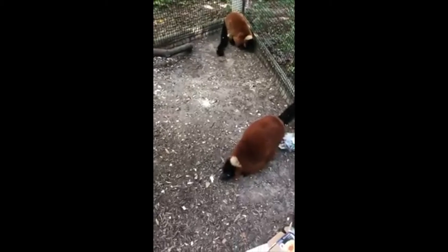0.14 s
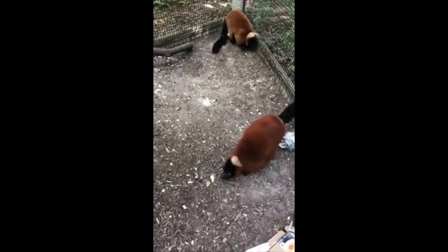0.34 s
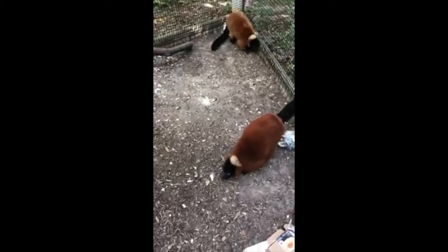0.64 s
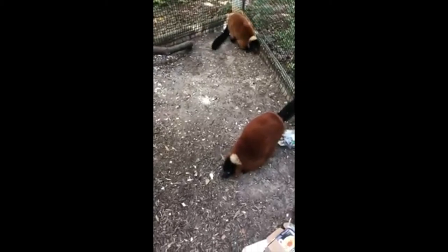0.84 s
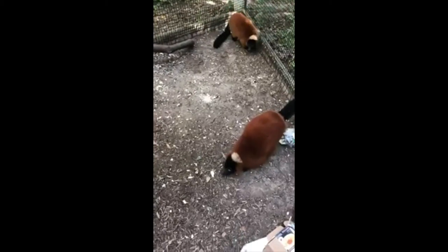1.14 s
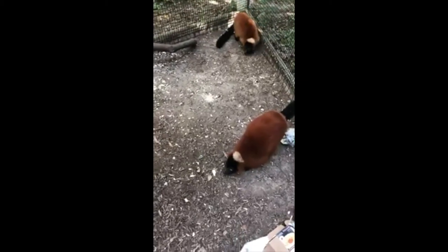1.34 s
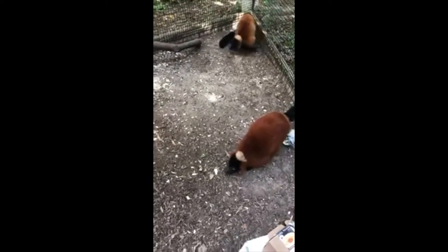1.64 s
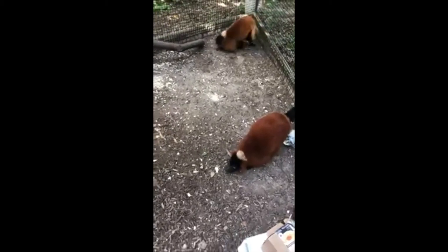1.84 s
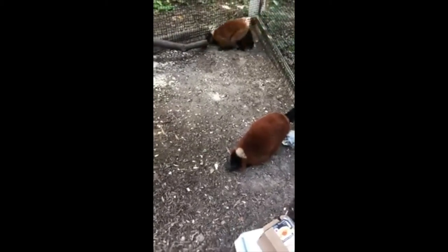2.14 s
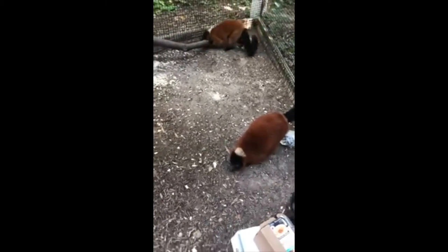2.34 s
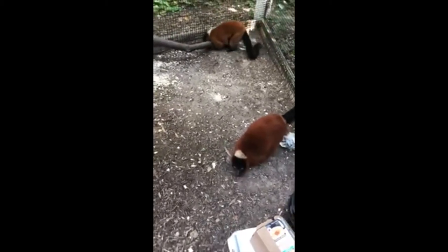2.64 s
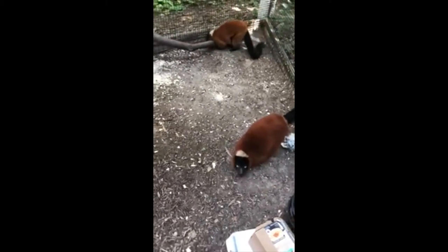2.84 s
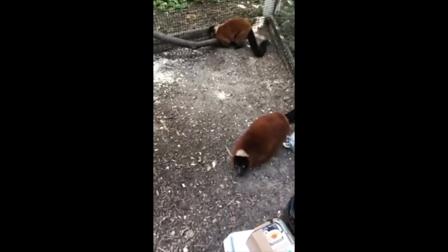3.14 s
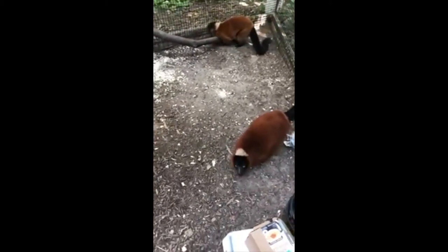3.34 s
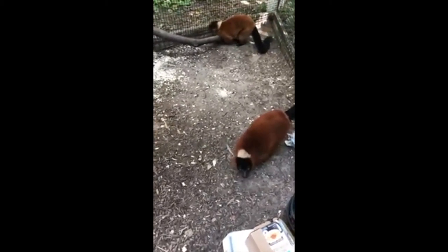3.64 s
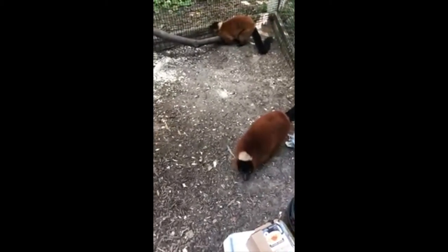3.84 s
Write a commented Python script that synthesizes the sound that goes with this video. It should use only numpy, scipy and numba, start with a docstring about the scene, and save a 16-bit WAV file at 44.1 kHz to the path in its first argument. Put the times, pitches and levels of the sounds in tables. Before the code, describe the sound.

Lemurs call loudly and close by in an outdoor pen. Three hoarse, partly rattling roars fill the first second, with more from 1.4 to 2.4 and 2.7 to 3.2 seconds. A second animal shrieks at the start, around 1.3 and at 2 seconds. Thin gliding whines fill the gaps. A bark and quick grunts come at 3.5 seconds, then a final roar and shriek at 3.8.

```python
"""Ruffed lemur chorus

Lemurs call in an outdoor pen, close to a phone. Hoarse roars, made of uneven glottal pulses
ringing the throat and mouth, break into a fast rattle, with a bark and a run of grunts near
the end. A second animal shrieks over them, and thin whines fill the gaps."""
import sys
import numpy as np
from scipy import signal
from scipy.fft import rfft, irfft
from scipy.io import wavfile
from scipy.ndimage import uniform_filter1d, map_coordinates
from numba import njit

SR = 44100
rng = np.random.default_rng(int(sys.argv[2]) if len(sys.argv) > 2 else 0)


def master_out(mix):
    """Clip the mix to full scale and print it as 16-bit PCM to the path in sys.argv[1]."""
    frames = np.transpose(np.atleast_2d(mix))
    ceiling = np.clip(frames, -1, 1)
    pcm = np.round(ceiling * 32767).astype(np.int16)
    wavfile.write(sys.argv[1], SR, pcm)


N = 176400
T = np.arange(N) / SR
ATTACK_S, RELEASE_S = 0.0067, 0.00062


def roars():
    """Glottal pulses ring chest, mouth and throat; resonances lift and rasp swells as the mouth opens."""
    # One list per roar. Each row: time in seconds, level in dB, mouth resonance in Hz,
    # upper resonance in dB against the mouth.
    roar_shapes = [
        [(0.018, -18.5, 780, -3), (0.308, -21, 933, -3), (0.437, -29, 775, -8.5)],
        [(0.457, -16, 750, -20), (0.533, -21, 914, -1), (0.725, -25.5, 1050, -6)],
        [(0.727, -19, 679.2, -4), (0.817, -17, 880, -2.5), (1.085, -24, 935, -1)],
        [(1.397, -21, 706, -5.5), (1.547, -19, 870, -0.5), (1.728, -31, 750, -3.5)],
        [(1.826, -21.5, 770, -6.5), (1.88, -17.5, 1100, -9.5), (1.94, -29, 990, 8.5)],
        [(2.133, -20.5, 688.2, -7.5), (2.235, -16.5, 834, -4.5), (2.425, -25.5, 824, -5.5)],
        [(2.729, -15, 680, -20), (2.869, -22.5, 768.2, 4.5), (2.949, -22, 686.2, -6)],
        [(2.968, -23, 674.4, -0.5), (3.196, -23, 770, 3), (3.226, -29, 736, -5.5)],
        [(3.82, -15.5, 674, -12), (3.854, -17, 780, -9), (4.0, -17.5, 850, -7.5)],
    ]
    # A bark, then a run of short grunts, with the same columns.
    grunt_shapes = [
        [(3.513,-20,840,-18),(3.55,-25.5,793,-3),(3.58,-33.5,654,4)],
        [(3.595,-31,676,-3),(3.632,-29,678.5,7),(3.665,-28,635,0.5),(3.705,-28,724,1),(3.73,-26.5,720.9,-1.5),(3.76,-31.5,670,1.5),(3.8,-26,710,-5.5)],
    ]
    # The throat in each of those calls. Each row: base upper resonance in Hz, rasp and chest in dB against
    # the voice, share by which the resonances start low, third resonance in Hz, its dB against the voice.
    throats = [(1246,-25,-11,0.056,1700,-14.5),(1390,-22.5,-13,0.3,2220,-14.5),(1200,-24.5,-12,0.017,1648,-11),(1173,-26,-12,0.12,1640,-18.5),(1464,-20,-14.5,0.51,2467,-16),(1247.6,-22.5,-12.5,0.12,1573,-16),(1423,-31.5,-15,0.61,2040,-18),(1341,-17.5,-9.5,0.099,1678,-4),(1381.5,-15,-9.5,0.13,2450,-16),(1530,-18,-11.5,0.047,2210,-7.5),(1667,-15,-8,0.024,2640,-17.5)]
    # The vocal folds. Each row: time in seconds, pitch in Hz, roughness.
    fold_track = [(.02,176,0.72),(.055,276.6,0.43),(.25,291.2,0.71),(.43,214,0.88),(.465,190.9,0.69),(.505,340,0.12),(.55,262.8,0.21),(.66,224.2,0.49),(.73,165,0.8),(.78,290.7,.5),(1.0,289.6,0.62),(1.085,194.5,.6),
                  (1.4,174.6,0.73),(1.5,298.7,0.71),(1.62,199,0.77),(1.825,175,0.72),(1.87,326.8,0.4),(1.94,219,.5),(2.135,174.3,0.26),(2.175,190.6,0.34),(2.205,312.4,0.52),(2.42,214.7,0.81),
                  (2.73,179.8,0.21),(2.78,326,0.27),(2.815,237.7,0.25),(2.84,206,0.07),(2.865,231.8,0.12),(2.93,247.1,0.35),(2.975,171.9,0.49),(3.05,269.1,0.44),(3.16,298.1,1.01),(3.225,180.5,0.62),(3.535,210.7,0.46),(3.63,273.3,0.79),(3.82,176,0.37),(3.86,205.5,0.18),(3.9,284,0.16),(4.0,289.6,0.6)]
    # Tone of the pulses feeding the mouth and upper resonances. Each row: frequency in Hz, gain in dB.
    mouth_eq = [(300,-41.5),(420,-7),(640,4),(1050,-4.5),(1600,-23.5)]
    upper_eq = [(750,-26),(1080,12.5),(1650,15.5),(2400,-11.5)]
    # High throat resonances. Each row: centre in Hz, gain in dB.
    rasp_bands = [(2480,-8),(3020,3.5),(3750,-2),(4750,-2.5),(5550,-3),(7250,-9.5),(8350,-12),(9700,-18.5),(11500,-16.5),(13500,-19)]

    pitch, rough = curves(fold_track)
    voice, breath = vocal_folds(pitch, np.clip(rough, 0, 1))
    calls = list(roar_shapes) + grunt_shapes
    rows = sorted((*row, *throat) for call, throat in zip(calls, throats) for row in call)
    db, mouth_hz, upper_db, upper_hz, rasp_db, chest_db, drop, third_hz, third_db = curves(rows)
    onsets, opening_s = [call[0][0] for call in calls], 0.062
    closed = np.max([np.exp(-np.abs(T - at) / opening_s) * (T > at - ATTACK_S) for at in onsets], axis=0)
    lift = 1 - np.clip(drop, 0, .6) * closed
    follow_mouth = (mouth_hz / np.mean(mouth_hz)) ** 0.31
    upper_hz = upper_hz * lift * np.exp(.04 * walk(50)) * follow_mouth

    puff = undb(-23) * steady(ring(breath, hz=80, width=250))
    chest = undb(0.37) * steady(ring(voice, hz=256, width=240)) + puff
    mouth = steady(resonate(colour(voice, mouth_eq), mouth_hz, width=191.))
    upper = steady(resonate(colour(voice, upper_eq), upper_hz, width=148.))
    hoarse = voice + .9 * breath
    rasp = np.zeros(N)
    for hz, band_db in rasp_bands:
        centre = hz * lift ** .5 * np.exp(.04 * walk(11))
        rasp += undb(band_db) * ring(hoarse, centre, width=hz * 0.073)
    rasp = steady(rasp) * (1 - 0.48 * closed) * throat_rattle() ** .5
    third = steady(ring(hoarse, third_hz * lift ** .5, width=500))

    vowel = undb(0.32) * mouth + undb(upper_db - 0.64) * upper
    body = undb(chest_db) * chest + undb(rasp_db) * rasp + undb(third_db) * third
    voice_level = np.hypot(1, undb(upper_db))
    return (vowel + voice_level * body) * undb(db) * gate(calls) * throat_rattle()


def vocal_folds(hz, rough):
    """Glottal pulses, uneven in time and size when rough, and the breath that hisses after each."""
    jitter, shimmer_db = .17, 4.5
    phase = np.cumsum(hz * np.exp(jitter * rough * walk(330))) / SR
    at = np.flatnonzero(np.diff(np.floor(phase)))
    late = (np.ceil(phase[at]) - phase[at]) / (phase[at + 1] - phase[at])  # fraction of a sample
    strength = (undb(shimmer_db * rough * np.minimum(walk(300), 1.5)) * np.sqrt(SR / hz))[at]
    pulses = np.zeros(N)
    pulses[at], pulses[at + 1] = strength * (1 - late), strength * late
    breath = steady(np.exp(-(phase % 1) / .4) * rng.standard_normal(N))
    return pulses + .55 * rough * breath, breath


def throat_rattle():
    """Gain of a throat that closes some 45 times a second in a rattle, with brief breaks of the voice."""
    # Rattling stretches. Each row: first closure and end in seconds, rate in Hz, depth from 0 to 1.
    rattles = [(0.116,0.41,44.46,0.67),(0.863,1.013,51.1,0.76),(2.259,2.393,44.1,0.15),(3.053,3.2,45.9,0.82)]
    # Voice breaks. Each row: time in seconds, depth from 0 to 1.
    breaks = [(0.11,0.7),(0.983,0.26),(0.519,0.5),(0.609,0.87),(.799,0.77),(1.005,0.64),(1.484,0.59),(1.885,0.73),(1.908,0.89),(2.302,0.53),(2.775,0.65),(3.651,0.98),(3.682,1),(3.788,0.58),(3.723,0.52),(3.925,0.82),(3.952,0.83)]
    opening, wander = np.ones(N), 0.11 * walk(30)
    for start, end, rate, depth in rattles:
        turn = (T - start) * rate + wander
        beats = undb(1.5 * walk(45)) * (1 - depth * np.cos(np.pi * turn) ** 2)
        opening *= np.where((turn > -.5) * (T < end), beats, 1)
    for when, depth in breaks:
        opening *= 1 - min(depth, .97) * np.exp(-((T - when) / 0.0077) ** 2)
    return opening / np.sqrt(uniform_filter1d(opening ** 2, size=2600))


def shrieks():
    """A very high voice, torn by a second vibration, between chaotic hiss and a hoarse arching squeal."""
    # One list per shriek. Each row: time in seconds, pitch in Hz, roughness, fundamental in dB,
    # overtones in dB.
    calls = [
        [(0,2323,0.56,-21.5,-28),(.022,2520,0.06,-31.5,-25.5),(.066,3600,0,-34.5,-33),(.09,3270,0,-34,-32),(.11,2430,0.2,-36,-40)],
        [(1.143,1161,0.79,-28,-33),(1.185,1398,0.58,-23,-19),(1.295,1505,0.45,-25.5,-24),(1.335,1200,1.08,-23,-29.5),(1.376,2707,0.48,-22.5,-20.5),(1.402,2420,0.54,-30.5,-24),(1.445,2950,0.16,-33.5,-24.5),(1.475,2659,0.43,-38,-28.5),(1.5,1842,0.46,-22.5,-28.5),(1.57,1540,0.66,-31,-40.5)],
        [(1.945,1500,1.06,-29,-36),(1.98,1740,0.65,-26,-38),(2.09,1773,0.91,-27.5,-34),(2.11,1767,0.26,-20.5,-36),(2.143,2859,0.14,-38.5,-23),(2.17,3050,0.27,-39,-29.5),(2.205,2600,0.38,-55,-33.5)],
        [(3.83,2700,0.99,-36,-36),(3.905,2719,0.63,-31.5,-37),(3.933,2891,0.53,-31.5,-25.5),(3.995,2880,.8,-32,-43.5)],
    ]
    # Resonance of the hissing air. Each row: time in seconds, centre in Hz.
    hiss_track = [(1.15,4200),(1.3,6420),(1.45,7500),(1.96,2870),(2.09,5113),(2.16,7970),(3.9,5796)]
    # Tone of the overtones. Each row: frequency in Hz, gain in dB.
    overtone_eq = [(2000,-10.5),(3000,-4),(4100,-6.5),(5400,5),(6900,1),(8000,4.5),(8900,8.5),(9500,4),(10500,-0.5),(12000,-2),(16000,-6)]
    hz, rough, low_db, high_db = curves([row for call in calls for row in call])
    rough = np.clip(rough, .22, 1.2)
    jitter = 1 + .09 * rough * walk(2200) + .012 * walk(400)
    phase = 2 * np.pi * np.cumsum(hz * jitter) / SR
    flutter_hz = 240 * np.exp(.5 * walk(300))
    vibration = np.sin(2 * np.pi * np.cumsum(flutter_hz) / SR)
    flutter = .9 + .7 * vibration + np.sqrt(rough) * walk(1000)
    overtones = sum(np.sin(k * phase) / k for k in range(2, 6))
    hiss = steady(ring(rng.standard_normal(N), curves(hiss_track)[0], width=1400))
    high = steady(steady(colour(overtones * flutter, overtone_eq)) + 1.3 * rough * hiss)
    growl = rough ** 2 * steady(colour(rng.standard_normal(N), [(420, -30), (720, -10.5), (3500, -17.5)]))
    low = steady(colour(np.sin(phase) * flutter, [(300, -30), (1300, -11), (4000, -12.5)])) + growl
    flicker = undb(2 * np.minimum(walk(240), 1))
    return flicker * (undb(low_db) * low + undb(high_db) * high) * gate(calls)


def whines():
    """Soft gliding notes through an almost closed mouth, clean when high and creaky when low."""
    # One list per whine. Each row: time in seconds, pitch in Hz, level in dB.
    calls = [
        [(1.06,282.5,-45),(1.095,289,-21.5),(1.13,241,-46)],
        [(1.7,430.8,-39),(1.765,416.7,-32),(1.81,313.6,-39)],
        [(2.42,222,-27.5),(2.495,264,-28),(2.535,381.9,-33),(2.605,403.3,-39.5),(2.625,394,-34.5),(2.66,297,-25.5),(2.705,255,-39.5)],
        [(3.225,210.7,-37),(3.31,197.8,-54.5),(3.355,316.5,-35),(3.375,296.6,-21),(3.425,236.3,-48),(3.46,244.4,-58),(3.477,269.1,-30),(3.5,231.6,-59)],
    ]
    # Tone of the almost closed mouth. Each row: frequency in Hz, gain in dB.
    mouth_eq = [(150,-11),(280,-6.5),(480,-23),(800,11.5),(1150,6),(1450,-29),(2150,-9.5),(3000,-45),(5500,-29),(16000,-103)]
    hz, db = curves([row for call in calls for row in call])
    voice, breath = vocal_folds(hz, rough=np.interp(hz, [220, 380], [.3, .04]))
    return steady(colour(voice + 0.086 * breath, mouth_eq)) * undb(db) * gate(calls)


def pen_reflections(calls):
    """The calls with their bounce off the ground and the short, faint echo of the pen."""
    ground_s, t60_s = 0.00121, 0.14
    calls = calls + undb(-42.5) * np.interp(T - ground_s, T, calls)
    tail = rng.standard_normal(N) * undb(-60 * T / t60_s) * (T > .006)
    echo = signal.fftconvolve(calls, tail / np.sqrt(np.sum(tail ** 2)))[:N]
    return calls + undb(-8.5) * echo


def outdoor_air():
    """A quiet, even bed of low noise."""
    # Tone of the air. Each row: frequency in Hz, gain in dB.
    air_eq = [(20,-18),(130,9.5),(900,-8),(2500,-14),(16000,-35.5)]
    air = colour(rng.standard_normal(N), air_eq)
    return undb(-51.5) * air / np.std(air)


def undb(db):
    """Decibels to amplitude."""
    return 10 ** (np.asarray(db) / 20)


def curves(rows):
    """The columns of a table, joined by straight lines in time."""
    rows = np.array(rows, float)
    return [np.interp(T, rows[:, 0], col) for col in rows.T[1:]]


def gate(calls):
    """Quick attack at each call's first row, short release after its last."""
    envelope = np.zeros(N)
    for call in calls:
        attack = np.clip((T - call[0][0]) / ATTACK_S + .5, 0, 1)
        release = np.exp(-np.maximum(T - call[-1][0], 0) / RELEASE_S)
        envelope = np.maximum(envelope, attack * release)
    return envelope


def steady(x):
    """Ride the level to one, keeping the fast grain."""
    return x / np.sqrt(np.abs(uniform_filter1d(x * x, size=1300)) + 1e-12)


def walk(rate):
    """Random wobble through `rate` values a second, with a spread near 1."""
    return map_coordinates(rng.standard_normal(N // 8), [T * rate], order=1, mode="wrap") * np.sqrt(3 / 2)


def colour(x, points, size=2048):
    """Minimum-phase EQ through (Hz, dB) points, rolling off beyond both ends."""
    hz, db = np.array(points, float).T
    log_hz = np.log(np.maximum(np.fft.rfftfreq(size, 1 / SR), 1))
    beyond = np.maximum(np.log(hz[0]) - log_hz, 0) + np.maximum(log_hz - np.log(hz[-1]), 0)
    cepstrum = irfft(np.log(undb(np.interp(log_hz, np.log(hz), db) - 20 * beyond)))
    cepstrum[1:size // 2] *= 2
    cepstrum[size // 2 + 1:] = 0
    return signal.oaconvolve(x, irfft(np.exp(rfft(cepstrum))))[:N]


@njit
def resonate(x, hz, width):
    """Band-pass with a moving centre and a width in Hz."""
    y, band, low = np.empty(len(x)), 0., 0.
    for i in range(len(x)):
        g, damping = np.tan(np.pi * hz[i] / SR), width / hz[i]
        v = (band + g * (x[i] + 1e-18 - low)) / (1 + g * (g + damping))
        band, low, y[i] = 2 * v - band, low + 2 * g * v, damping * v
    return y


def ring(x, hz, width):
    """A steep resonance: the band-pass twice."""
    hz = hz * np.ones(N)
    return resonate(resonate(x, hz, float(width)), hz, float(width))


def scene():
    """The animals in their pen over outdoor air, in mono."""
    calls = roars() + shrieks() + whines()
    return (pen_reflections(calls) + outdoor_air())[None]


def record(dry):
    """The phone rounds the highest peaks without adding bass, and cuts the top."""
    ceiling, top_hz = 0.53, 15700
    rounded = dry / (1 + (dry / ceiling) ** 6) ** (1 / 6)
    distortion = signal.sosfilt(signal.butter(2, 150, "high", fs=SR, output="sos"), rounded - dry)
    return signal.sosfilt(signal.ellip(10, .2, 80, top_hz, fs=SR, output="sos"), dry + distortion)


dry = scene()
out = record(dry)
master_out(out)
```